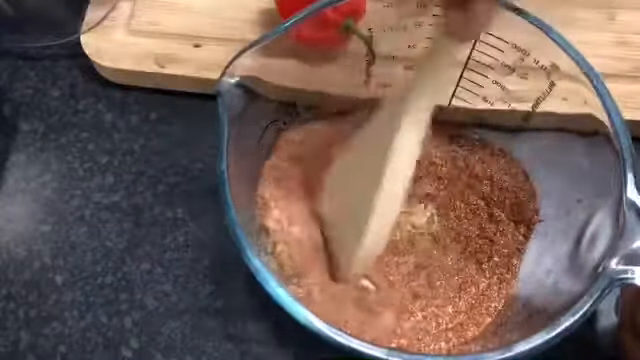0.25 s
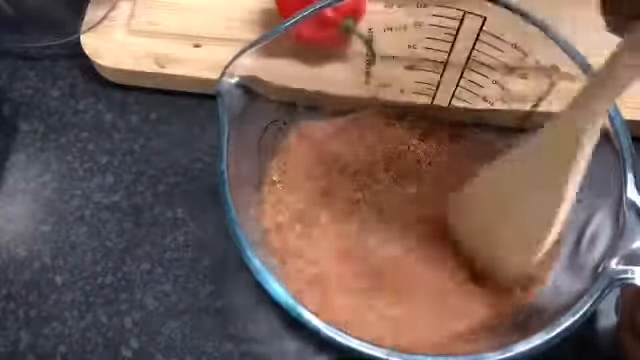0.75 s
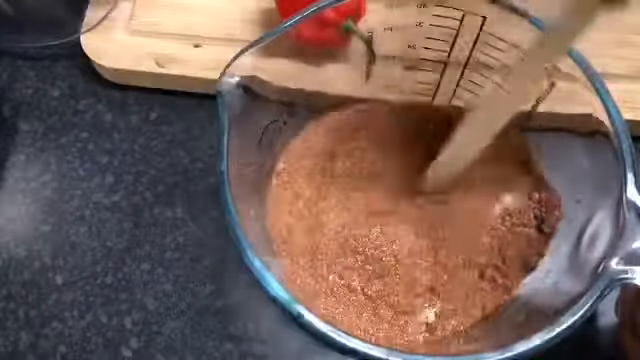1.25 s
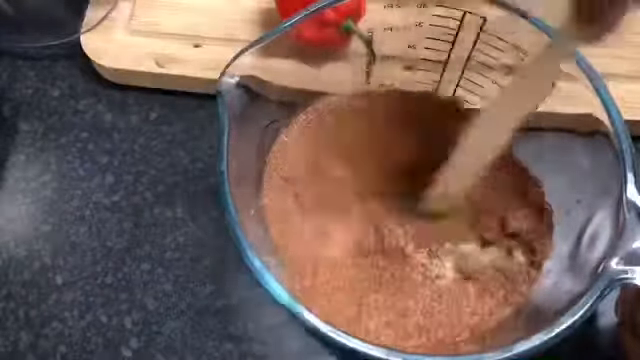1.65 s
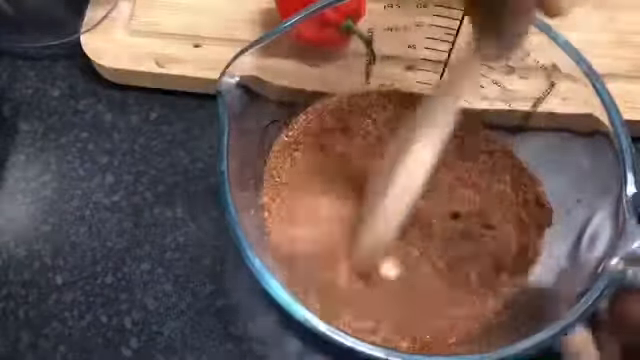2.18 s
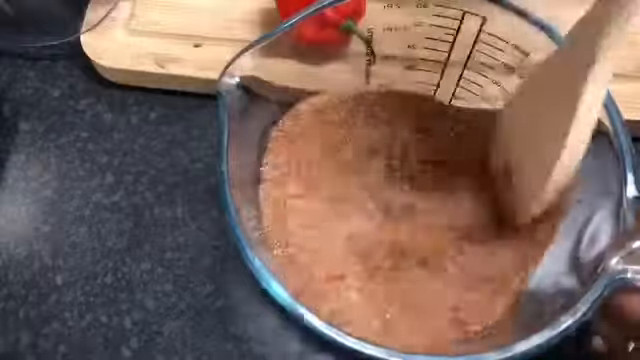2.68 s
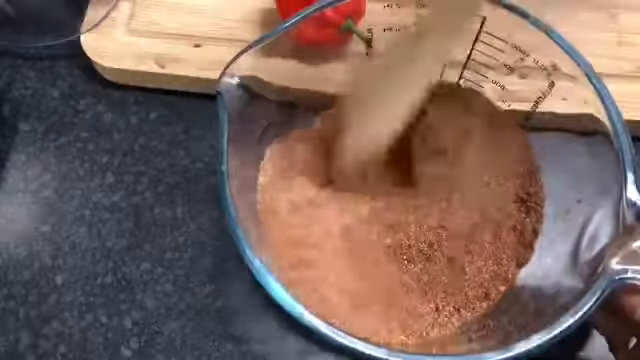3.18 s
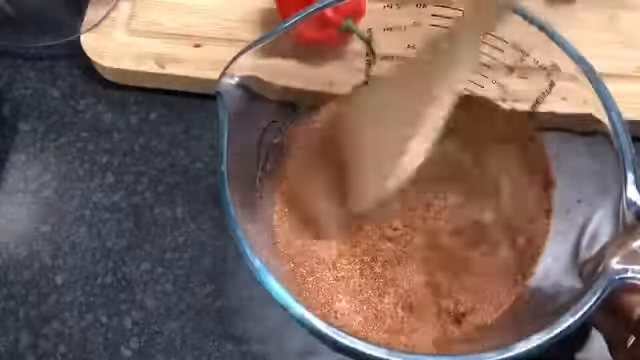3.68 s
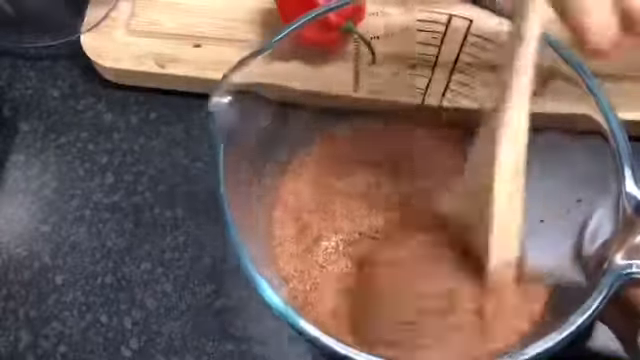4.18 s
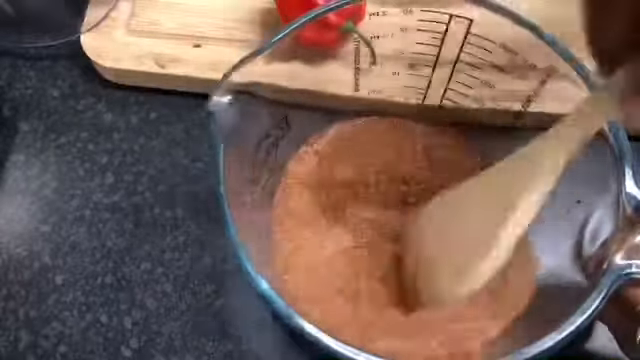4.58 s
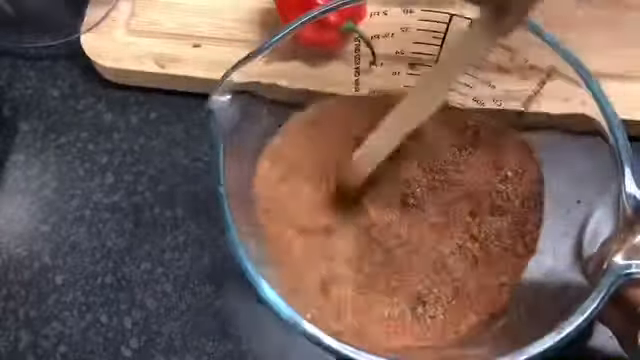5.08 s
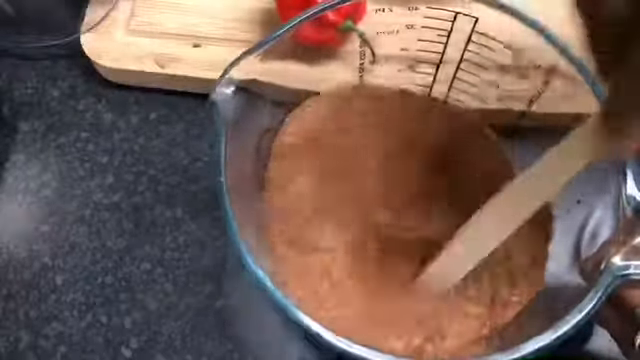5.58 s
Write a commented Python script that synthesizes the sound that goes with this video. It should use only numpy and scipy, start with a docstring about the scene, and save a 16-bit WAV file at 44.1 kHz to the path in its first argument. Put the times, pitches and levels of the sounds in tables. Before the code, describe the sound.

Close, dry stirring: sandy swishes two or three times a second, scraping glass, broken by a few hard clacks in a quiet kitchen.

```python
"""Gritty powder hisses in short sweeps as a wooden spoon stirs dry spice in a glass jug, close to a phone.
Filtered random grains make the hiss and scrape; quick swells of them make the scuffs against the glass.
Knocks are clicks with noisy crunch that excite damped modes of the jug; jolts ring modes of the counter.
A small room answers with decaying noise, over a faint appliance rumble of coloured noise and mains hum.
"""
import sys
import numpy as np
from scipy import signal
from scipy.fft import rfft, irfft, next_fast_len
from scipy.io import wavfile
from scipy.ndimage import uniform_filter1d

SR = 44100
rng = np.random.default_rng(int(sys.argv[2]) if len(sys.argv) > 2 else 0)


def generate_wav(sig):
    """Save sig (samples, or channels by samples) to the path in sys.argv[1] as 16-bit PCM at SR."""
    pcm = np.round(np.clip(np.atleast_2d(sig).T, -1, 1) * 32767).astype(np.int16)
    wavfile.write(sys.argv[1], SR, pcm)


N = 257269
TIME = np.arange(N) / SR  # s

# All levels are relative, ahead of the final mix.
# sweeps of the spoon through the powder:
# start_s, length_s, hiss_db, scrape_db, rumble_db, change_db from start to end
SWEEPS = [(-.03, .2, -63, -65.5, -70, -10), (0.361, 0.34, -63, -63.5, -74, -7),
          (.78, .3, -59, -62, -74, -5), (1.138, 0.14, -65, -67, -78, -6.5),
          (1.349, 0.21, -62, -68.5, -69, -2), (1.57, 0.2, -60.5, -67.5, -62, -8),
          (1.964, 0.27, -70.5, -67.5, -69, -1), (2.306, 0.17, -69.5, -70.5, -70.5, 7.5),
          (2.55, .1, -77, -75.5, -85, -3), (2.669, 0.35, -61, -67, -65, -9.5),
          (3.207, 0.31, -58.5, -59.5, -62.5, -7.5), (3.739, 0.28, -56.5, -60, -64, -3),
          (4.027, 0.083, -61, -61, -56, -3.5), (4.286, 0.13, -58.5, -62.5, -58.5, -5),
          (4.49, 0.085, -61, -63, -68, -1.5), (4.782, 0.25, -61, -68.5, -57, -13),
          (5.15, 0.24, -66.5, -74.5, -67, 2.5), (5.466, 0.27, -62.5, -68.5, -73, -3)]
# short scuffs where the edge of the spoon catches the glass: start_s, length_s, hiss_db, scrape_db
SCUFFS = [(0.265, 0.062, -70.5, -75), (.445, .03, -54, -60), (0.492, 0.028, -58.5, -65),
          (0.632, 0.053, -59, -61), (0.891, 0.07, -61, -60.5), (1.052, 0.081, -56.5, -71.5),
          (1.43, 0.032, -62, -64), (1.58, 0.046, -52, -55.5), (1.685, 0.029, -57, -74),
          (1.756, 0.017, -55, -65), (2.074, 0.079, -53, -70), (2.185, 0.035, -63, -59),
          (2.399, 0.017, -59, -59), (2.752, 0.022, -50.5, -67), (2.967, 0.087, -60, -65),
          (3.321, 0.021, -56.5, -64), (3.656, 0.033, -67, -90), (3.812, 0.058, -43.5, -62),
          (3.915, 0.09, -56, -66), (4.84, 0.06, -54.5, -62.5), (5.027, 0.15, -60.5, -69),
          (5.169, .03, -53.5, -62), (5.275, 0.046, -57.5, -60), (5.507, 0.035, -59, -75),
          (5.602, .035, -54, -60), (5.812, 0.07, -65, -65)]
# spectrum of the grit hiss: centre_hz, level_db of each band
GRIT_BANDS = [(3200, 3), (4200, -16.5), (5500, 0.5), (7200, 3), (9200, 3), (11500, 5), (14000, 1)]
# spectrum of wood scraping on glass: freq_hz, density_db
SCRAPE_COLOUR = [(500, -15.5), (900, -0.5), (1600, -1), (2600, 2.5), (3600, -3.5), (5000, 0.5), (8000, -15)]
# spectrum of the stirring rumble in the counter: freq_hz, density_db
RUMBLE_COLOUR = [(50, -29), (110, 3), (280, 1), (450, -3), (800, -7.5), (1500, -26)]
# knocks of the spoon on the glass: start_s, clack_db, clack_hz, clack_half_width_octaves, tick_db,
# low_ring_db (modes under 3 kHz), high_ring_db (modes above), place_quarter_turns round the wall
KNOCKS = [(0.09, -60, 1000, 0.76, -53, -14, -10, 0.43), (.342, -42.5, 980, 0.56, -28.5, 7, -3.5, 0.5),
          (.443, -49.5, 2580, 1.6, -46, 0.5, -11, 0.64), (.499, -61.5, 2000, 1.2, -58, 5, -6, 0.98),
          (1.759, -68, 4800, 0.67, -55, -11, -9, .46), (1.948, -61, 3600, 0.55, -37.5, -3, -6, 0.76),
          (2.393, -52, 4000, 0.47, -51.5, -13, -2, 1), (2.434, -44, 598, 0.36, -63, -15, -6, 0.56),
          (2.673, -42.5, 3100, 0.71, -41, -6, -4, 1), (2.699, -45.5, 3560, 0.85, -47, -9, -9, .5),
          (2.759, -63, 3600, 1, -41.5, -15, -19, 0.41), (3.1451, -17.5, 1610, 0.97, -45, -3, -1, 1),
          (3.522, -51, 1200, 0.55, -68, -30, -9, 0.52), (3.702, -34.5, 3440, 0.71, -27.5, -6, -7, 0.27),
          (3.914, -47.5, 2700, 0.63, -58, -10, 8.5, 0.56),
          (4.2617, -22.5, 1434, 0.64, -22.5, -13, -8.5, 0.22),
          (4.472, -56.5, 3000, 1.7, -65, -22, -13, 0.58), (4.6964, -19.5, 2600, 1.34, -76, -2.5, -20, 0.33),
          (5.25, -49, 4430, .7, -43.5, -13, -3, 0.44), (5.594, -69, 3000, 0.85, -50, -14, -13, .45)]
# bands of the crunch at each knock: low_hz, high_hz
CRUNCH_BANDS = [(400, 750), (750, 1100), (1100, 1500), (1500, 2100), (2100, 3000), (3000, 4300),
                (4300, 6200), (6200, 10500), (10500, 16500)]
# modes of the jug, alternate rows turned a quarter lobe: pitch_hz, level_db, t60_s when struck, lobes (count)
GLASS_MODES = [(641, -20, .3, 0), (1080, -11, .07, 0), (858, -3, .2, 1), (919, 0, .14, 1),
               (1375, -7, .07, 1), (1600, -8, .1, 1), (2050, -2, .1, 1), (2397, -4, .1, 1),
               (1810, -7, .07, 0), (1250, -13, .07, 1), (4350, -5, .05, 1), (3500, -10, .1, 2),
               (3876, -12, .12, 3), (5880, -6, .1, 3), (7210, -2, .11, 0), (6654, -8, .09, 4),
               (8484, -5, .12, 2), (7740, -9, .08, 5), (9143, -5, .07, 5), (9545, -8, .1, 4),
               (10350, -5, .14, 2), (9975, -9, .1, 6), (12020, -5, .1, 5), (11300, -7, .09, 6),
               (12530, -8, .1, 7), (13180, -6, .06, 7), (14400, -8, .1, 8), (14200, -4, .08, 3)]
# jolts of the jug against the counter: start_s, low_db (under 200 Hz), mid_db (200 to 400 Hz), high_db (above)
JOLTS = [(.347, -44, -36, -45), (0.453, -56, -53, -56), (1.598, -66, -54, -42), (1.96, -67, -48, -55),
         (2.081, -57, -50, -50), (2.187, -52, -68, -62), (2.405, -46, -35, -45), (2.43, -67, -43, -43),
         (2.509, -55, -70, -72), (2.681, -74, -45.5, -51), (2.697, -54, -48, -49), (2.767, -54, -41.5, -48),
         (3.148, -40.5, -37, -28), (3.317, -49.5, -47.5, -54), (3.704, -35, -39.5, -42),
         (3.947, -39, -50, -54), (4.268, -36, -35, -32), (4.357, -52.5, -62, -62), (4.701, -35.5, -35, -27),
         (5.174, -41.5, -38, -45), (5.255, -40.5, -37.5, -42.5), (5.301, -46.5, -60, -48),
         (5.501, -53, -46, -49), (5.604, -45, -38, -40)]
# modes of the counter under the jug: pitch_hz, level_db, t60_s
COUNTER_MODES = [(124, -2, .17), (152, 0, .14), (180, -5, .1), (250, -2, .1), (295, 0, .11), (350, -6, .08),
                 (443, -4, .12), (555, -10, .08)]
# decay of the room by band: centre_hz, t60_s
ROOM_DECAY = [(200, 0.51), (1000, 0.37), (3000, 0.2), (9000, 0.081)]
# spectrum of appliance rumble and microphone hiss: freq_hz, density_db
KITCHEN_COLOUR = [(15, -28), (25, 10.5), (197, 0), (399, -4.5), (445, -1.5), (584, -6.5), (746, -4),
                  (2900, -16.5), (11300, -20), (12600, -21.5), (15200, -16), (16500, -54)]

DIG_IN_S, LIFT_S = 0.052, 0.073  # a sweep gains or loses 20 dB in this time
SCUFF_RUMBLE_DB = -9.5  # relative to the scrape of the scuff
CLACK_EDGE_DB = -6.5  # the clack is this far down at its edges
TICK_HZ, TICK_DB_PER_OCTAVE = 11200, -6.5  # the tick thins out below its corner
CLICK_DB = 1
CRUNCH_S = 0.0035  # 1/e decay for a band starting at 1 kHz
RATTLE_S, RATTLE_DB = 0.0084, -8.5  # slower decay under the crunch, also at 1 kHz
SING_DB, SING_WANDER_DB, SING_T60_S = -42, 7.5, 0.032  # glass modes under the rubbing spoon
KITCHEN_DB, HUM_HZ, HUM_DB = -67.5, 50, -70.5
TOP_HZ = 15750  # upper limit of the phone


def stirring():
    """Grit snaps, wood scrapes on glass and the counter rumbles, all following the hand."""
    hiss_gain, scrape_gain, rumble_gain = hand()
    slip_db = 0.24 * walk(40)  # the spoon sticks and slips through the powder

    grit = grains(14000, 1.38)
    hiss = 0
    for k, (hz, db) in enumerate(GRIT_BANDS):
        # each band swells on its own as coarse and fine powder pass
        swell = undb(1.8 * walk(35))
        polarity = (-1) ** k  # neighbouring bands overlap with opposite signs
        hiss = hiss + polarity * undb(db) * swell * band(grit, hz / 1.18, hz * 1.333)
    hiss = unit(hiss) * hiss_gain * undb(slip_db)

    rasp = grains(11000, 1.7)
    scrape = colour(rasp, SCRAPE_COLOUR) * scrape_gain * undb(slip_db + 0.96 * walk(50))

    rumble = colour(rng.standard_normal(N), RUMBLE_COLOUR)
    # a faint floor stays between the sweeps
    rumble = rumble * (rumble_gain + undb(-76)) * undb(2.0 * walk(22.24))
    return hiss + scrape, rumble


def hand():
    """The hand's motion sets hiss, scrape and rumble gains: long sweeps with short scuffs on top."""
    start, length, hiss_db, scrape_db, rumble_db, change_db = np.transpose(SWEEPS)
    sweeps = swells(start, length, change_db, DIG_IN_S, LIFT_S, hiss_db, scrape_db, rumble_db)

    start, length, hiss_db, scrape_db = np.transpose(SCUFFS)
    # a scuff is mostly rise and fall, with a brief hold
    scuffs = swells(start - 0.087 * length, 0.17 * length, 0, 0.81 * length, 1.07 * length,
                    hiss_db, scrape_db, scrape_db + SCUFF_RUMBLE_DB)
    return np.sqrt(np.add(sweeps, scuffs))


def swells(start, length, change_db, rise_s, fall_s, *levels_db):
    """Each swell rises, holds with a steady drift and falls; overlaps add in power, one curve per level column."""
    coarse_time = TIME[::64]
    t = coarse_time[:, None] - start
    edges_db = 20 * (np.minimum(t, 0) / rise_s - np.maximum(t - length, 0) / fall_s)
    shape_db = edges_db + change_db * np.clip(t / length, 0, 1)
    powers = []
    for db in levels_db:
        power = (undb(shape_db + db) ** 2).sum(axis=1)
        powers.append(np.interp(TIME, coarse_time, power))
    return powers


def grains(per_s, spread_db):
    """Countless grains snap past the spoon at random, a few much bigger than the rest."""
    hit = rng.random(N) < per_s / SR
    return hit * rng.standard_normal(N) * undb(spread_db * rng.exponential(size=N))


def knocks():
    """Each blow is a sharp click and a few milliseconds of crunch from powder caught under the spoon."""
    start = np.transpose(KNOCKS)[0]
    out = clicks()
    t = TIME[:3000]
    for lo, hi in CRUNCH_BANDS:
        db = knock_db(np.sqrt(lo * hi))
        crunch = np.exp(-t / (CRUNCH_S * (1000 / lo) ** 0.4))
        # the wooden spoon and loose powder rattle on
        rattle = undb(RATTLE_DB) * np.exp(-t / (RATTLE_S * (1000 / lo) ** 0.22))
        envelope = blows(start, undb(db - 11.5), crunch + rattle)
        out = out + envelope * unit(band(rng.standard_normal(N), lo, hi, order=4))
    return out


def clicks():
    """One compact minimum-phase pulse per knock, with its energy as early as its colour allows."""
    hz = np.maximum(np.arange(513), 1)[:, None] * SR / 1024
    gain = undb(knock_db(hz) + CLICK_DB) * SR * hz / (hz ** 2 + 500 ** 2)
    # folding the cepstrum forward in time gives minimum phase
    cepstrum = irfft(np.log(gain), axis=0)
    cepstrum = np.vstack([cepstrum[:1], 2 * cepstrum[1:512]])
    spectrum = np.exp(rfft(cepstrum, 1024, axis=0))
    pulses = irfft(spectrum, axis=0)[:512].T
    return sum(blows([row[0]], 0.81, pulse) for row, pulse in zip(KNOCKS, pulses))


def knock_db(hz):
    """Level of every knock at one frequency: the broad clack of wood plus the thin tick of glass."""
    _, clack_db, clack_hz, octaves, tick_db = np.transpose(KNOCKS)[:5]
    clack_widths = np.abs(np.log2(hz / clack_hz) / octaves)
    clack = undb(clack_db + CLACK_EDGE_DB * clack_widths ** 3)
    tick = undb(tick_db + TICK_DB_PER_OCTAVE * np.maximum(np.log2(TICK_HZ / hz), 0))
    return 20 * np.log10(np.hypot(clack, tick))


def jug(rubbing):
    """The damped modes of the glass ring at each knock and sing faintly where the spoon rubs it."""
    start, *_, low_db, high_db, place = np.transpose(KNOCKS)
    out = 0
    for k, (hz, db, t60, lobes) in enumerate(GLASS_MODES):
        ring_db = low_db if hz < 3000 else high_db
        blow_db = knock_db(max(hz, 900)) + ring_db
        # a blow drives a mode by its lobe at that place; alternate modes are turned a quarter lobe
        turn = (k % 2) * np.sign(lobes)
        reach = np.cos((lobes * place - turn) * np.pi / 2)
        push = np.hanning(int(SR / hz) + 3)  # lasts about one cycle of the mode
        struck = ring(blows(start, undb(blow_db) * reach, 2 * push / push.sum()), hz, t60)
        # the pressing spoon damps the wall, and each mode's drive wanders
        drive = undb(SING_DB + SING_WANDER_DB * walk(9)) * rubbing
        rubbed = ring(drive, hz, SING_T60_S)
        out = out + undb(db) * (struck + rubbed)
    return band(out, 400, 18000)


def counter():
    """Soft jolts of the jug's base ring the worktop's damped modes, each a little differently every time."""
    start, *part_db = np.transpose(JOLTS)
    push = np.hanning(90) / 45  # about 2 ms
    chance = rng.standard_normal((len(start), len(COUNTER_MODES))).T
    rings = 0
    for (hz, db, t60), luck in zip(COUNTER_MODES, chance):
        part = np.searchsorted([200, 400], hz)  # low, mid or high column
        jolt_db = db - 4.0 + part_db[part] + 3.06 * luck
        rings = rings + ring(blows(start, undb(jolt_db), push), hz, t60)
    # only 110 to 900 Hz of the ringing is heard, with little deep bass
    return band(rings, 110, 900, order=4)


def room(x):
    """Dense reflections, as banded noise, die faster in the treble."""
    t = TIME[:SR // 2]
    tail = 0
    for hz, t60 in ROOM_DECAY:
        noise = unit(band(rng.standard_normal(SR // 2), hz / 2.4, hz * 2.44)) * np.sqrt(hz / SR)
        tail = tail + noise * undb(-60 * t / t60)
    # the first walls answer after about 5 ms, and the tail is full 12 ms later
    tail = tail * np.clip(t / 0.012 - 0.4, 0, 1)
    return signal.fftconvolve(x, tail)[:N]


def kitchen():
    """Coloured noise gives appliance rumble and microphone hiss; a wavering sine gives the mains hum."""
    hum = undb(HUM_DB + 0.87 * walk(4.2)) * np.sin(2 * np.pi * HUM_HZ * TIME)
    return colour(rng.standard_normal(N), KITCHEN_COLOUR) * undb(KITCHEN_DB) + hum


def undb(db):
    """Amplitude gain of a level in dB."""
    return 10 ** (np.asarray(db) / 20)


def unit(x):
    """Scale to rms 1."""
    return x / np.sqrt(np.mean(x ** 2))


def colour(x, points):
    """Shape a noise by (freq_hz, density_db) points; rms 1."""
    hz, db = np.transpose(points)
    size = next_fast_len(N)
    log_hz = np.log(np.arange(1, size // 2 + 2) * SR / size)
    gain = undb(np.interp(log_hz, np.log(hz), db, left=-80))
    return unit(irfft(rfft(x, size) * gain, size)[:N])


def band(x, lo_hz, hi_hz, order=2):
    """Keep one stretch of the spectrum."""
    return signal.sosfilt(signal.butter(order, [lo_hz, hi_hz], "bandpass", fs=SR, output="sos"), x)


def ring(x, hz, t60):
    """One damped mode: a complex resonator that loses 60 dB in t60 seconds."""
    pole = np.exp(2j * np.pi * hz / SR - np.log(1000) / (t60 * SR))
    return signal.lfilter([1], [1, -pole], x).imag


def walk(rate):
    """Random levels, rate per second, smoothed twice; rms 1."""
    k = int(SR / rate)
    steps = np.repeat(rng.standard_normal(N // k + 3), k)
    smooth = uniform_filter1d(uniform_filter1d(steps, k), k)
    return unit(smooth[k:N + k])


def blows(times, size, shape):
    """The same force shape at every time, scaled by its size."""
    train = np.zeros(N)
    train[(np.asarray(times) * SR).astype(int)] = size
    return signal.oaconvolve(train, shape)[:N]


def scene():
    """Stirring, knocks, jug and counter up close, then their room answer and the kitchen behind."""
    rubbing, rumble = stirring()
    near = undb(1.6) * knocks() + jug(rubbing) + counter() + undb(0.5) * rubbing + rumble
    return (near + undb(-35.5) * room(near) + kitchen())[None]


def record(dry):
    """The phone drops the deepest bass and cuts the top."""
    bassless = signal.sosfilt(signal.butter(6, 42, "highpass", fs=SR, output="sos"), dry)
    return signal.sosfilt(signal.ellip(10, 0.3, 70, TOP_HZ, fs=SR, output="sos"), bassless)


dry = scene()
out = record(dry)
generate_wav(out)
```